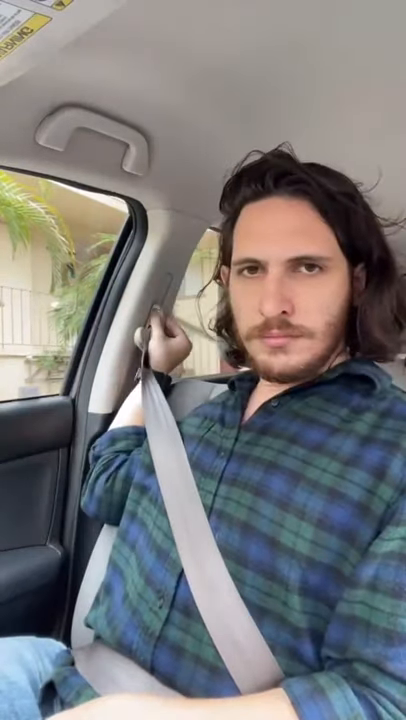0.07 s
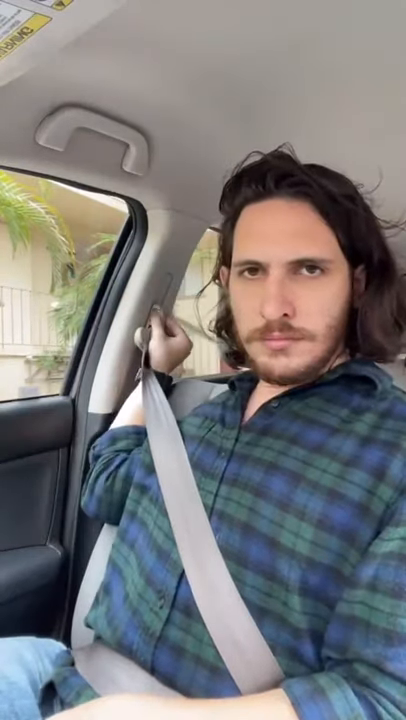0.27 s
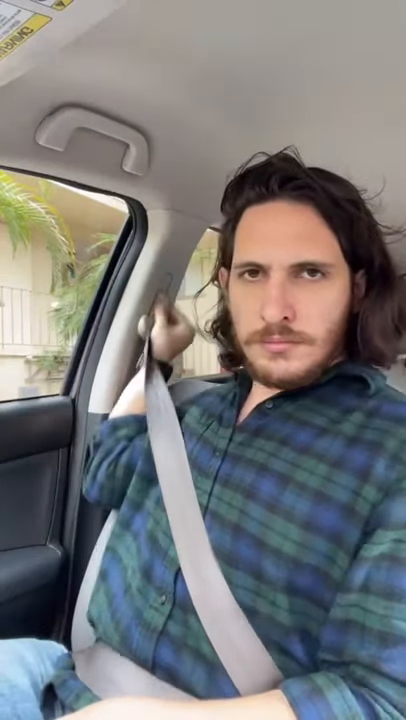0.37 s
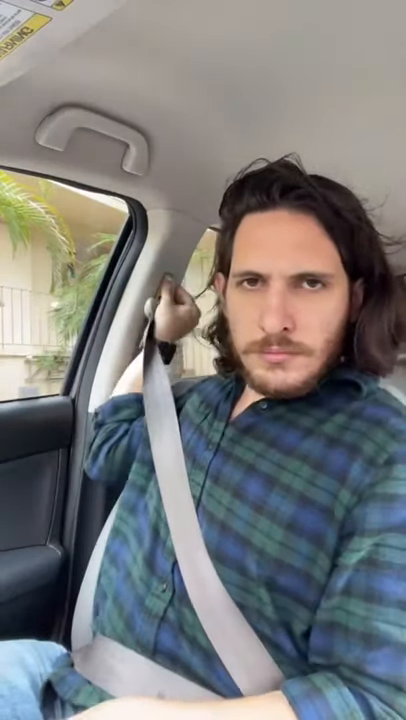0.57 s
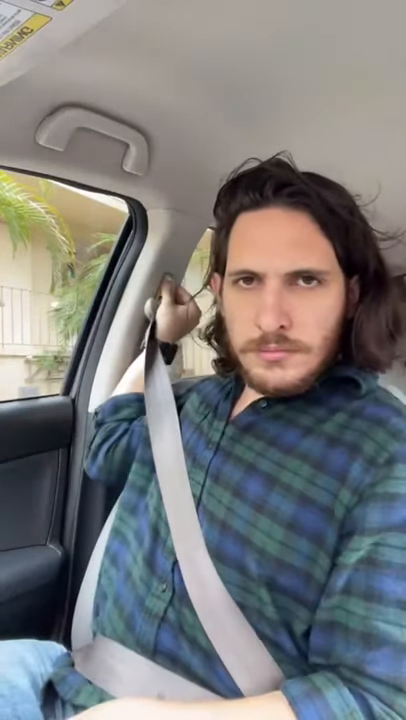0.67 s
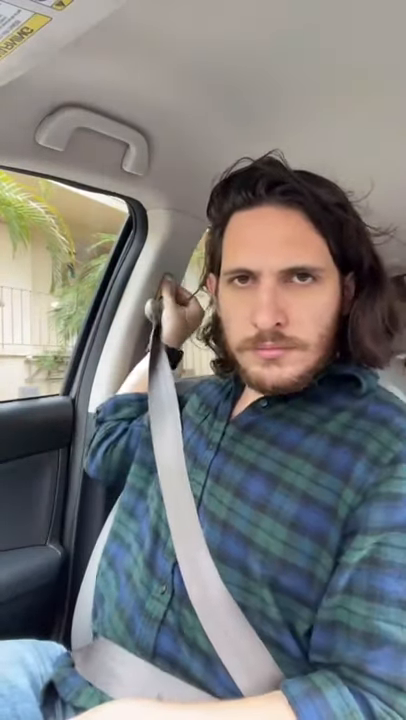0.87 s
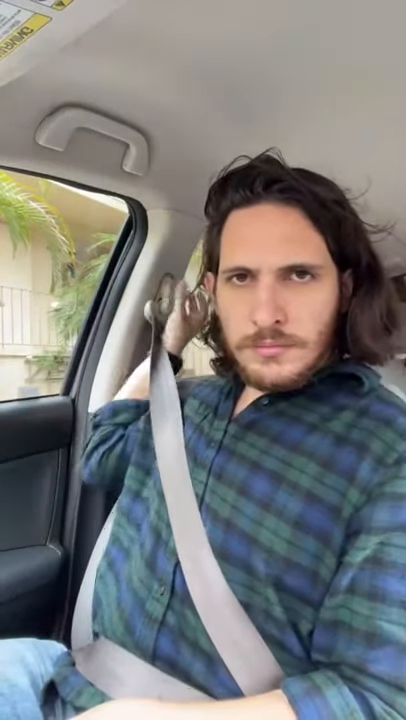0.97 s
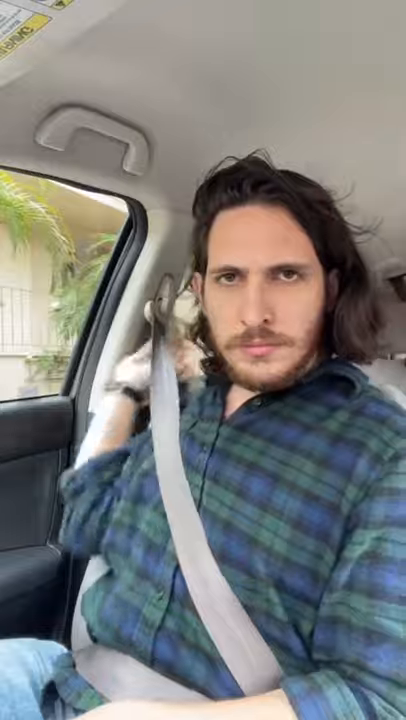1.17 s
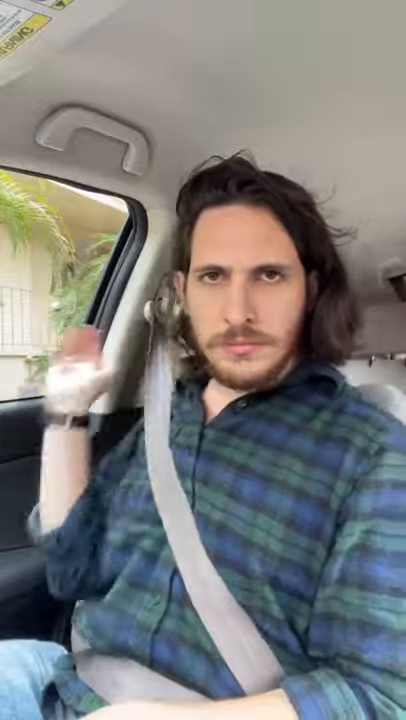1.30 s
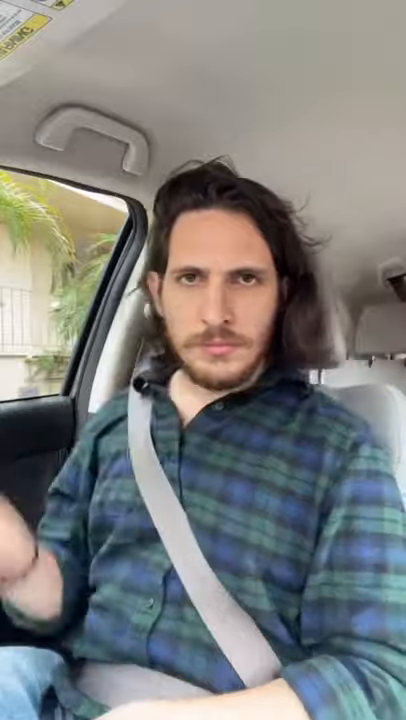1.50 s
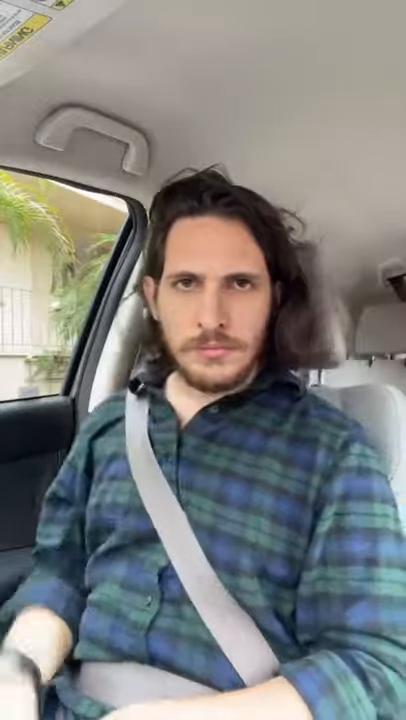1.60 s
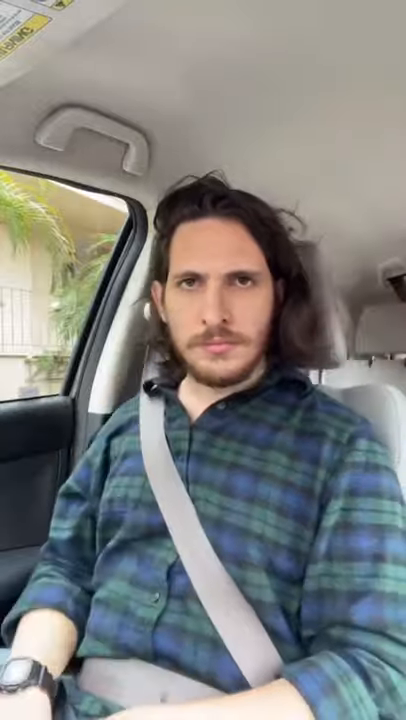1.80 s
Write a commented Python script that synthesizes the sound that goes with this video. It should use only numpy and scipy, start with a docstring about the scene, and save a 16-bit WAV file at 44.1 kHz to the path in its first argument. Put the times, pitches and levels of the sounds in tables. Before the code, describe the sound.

A seatbelt anchor clunks down, then clicks back up inside a car, with soft clothing rustle.

```python
"""Inside a parked car, a seatbelt anchor slides down its pillar and clunks against the stop, then is
pushed up and latches with a double click. Each impact excites damped modes of steel and plastic.
The belt runs back in soft ticks and a shirt sleeve rustles, its friction a stream of tiny slips.
The small padded cabin rumbles, booms in its low modes and quickly absorbs the treble."""
import sys
import numpy as np
from scipy import signal
from scipy.fft import rfft, irfft
from scipy.io import wavfile

SR = 44100
rng = np.random.default_rng(int(sys.argv[2]) if len(sys.argv) > 2 else 0)


def pcm_store(signal):
    """Save signal as 16-bit PCM."""
    levels = np.round(np.clip(np.atleast_2d(signal), -1, 1) * 32767)
    wavfile.write(sys.argv[1], SR, levels.astype(np.int16).T)


N = 81585
CONTACT_RISE_S = 0.00059


def amp(db):
    """Amplitude ratio of a level in decibels."""
    return 10 ** (np.asarray(db) / 20)


def unit(x):
    """Normalisation to an rms of 1."""
    return x / np.sqrt(np.mean(x ** 2) + 1e-20)


def read(points, hz):
    """Interpolation on a log-frequency axis."""
    f, value = np.transpose(points)
    return np.interp(np.log(hz + 1), np.log(f + 1), value)


def level(points):
    """Amplitude envelope, interpolated in decibels."""
    return amp(np.interp(np.arange(N) / SR, *np.transpose(points)))


def colour(x, spectrum):
    """Minimum-phase filtering: the phase follows from the log gain by the Hilbert transform."""
    size = 16384
    log_gain = np.log(amp(read(spectrum, abs(np.fft.fftfreq(size, 1 / SR)))))
    response = np.exp(np.conj(signal.hilbert(log_gain)))
    taps = irfft(response[:size // 2 + 1])[:size // 2]
    return signal.fftconvolve(x, taps * np.hanning(size)[size // 2:])[:N]


def noise(spectrum):
    """Spectrally shaped Gaussian noise of rms 1."""
    return unit(colour(rng.standard_normal(N), spectrum))


def since(start):
    """Elapsed seconds, zero before the start."""
    return np.maximum(np.arange(N) / SR - start, 0)


def blow(start, rise, t60):
    """Impact envelope: linear rise, exponential decay of 60 dB in t60 seconds."""
    t = since(start)
    return np.minimum(t / rise, 1) * amp(-60 * np.minimum(t / t60, 3))


def ring(start, modes, tilt_db=0):
    """Modal superposition: a struck part vibrates as a sum of damped sinusoids."""
    length_s = min(1.2, 2 * max(t60 for hz, db, t60 in modes))
    t = np.arange(0, length_s, 1 / SR)
    middle_hz = modes[len(modes) // 2][0]
    sound = sum(amp(db + tilt_db * np.log2(hz / middle_hz) - 60 * t / t60) * np.sin(2 * np.pi * hz * t)
                for hz, db, t60 in modes)
    return np.pad(sound * np.minimum(t / CONTACT_RISE_S, 1), (round(start * SR), N))[:N]


def friction(spectrum, spread_db, slips_per_s):
    """Stick-slip friction: a filtered Poisson stream of tiny, uneven impulses."""
    slips = (rng.random(N) < slips_per_s / SR) * rng.choice([-1, 1], N)
    sizes = amp(spread_db * np.minimum(rng.exponential(1, N), 4))
    return unit(colour(slips * sizes, spectrum))


def knock(start, hz, t60, q, rattle):
    """Forced response: an impulse and a short rattle drive a broad resonance of plastic."""
    chatter = blow(start, CONTACT_RISE_S, t60) * rng.standard_normal(N)
    drive = rattle * chatter / np.linalg.norm(chatter)
    drive[round(start * SR)] += 1
    sound = signal.lfilter(*signal.iirpeak(hz, q, fs=SR), drive)
    top_hz = min(2.72 * hz, SR / 3)  # a soft contact gives little treble
    sound = signal.lfilter(*signal.butter(2, top_hz, fs=SR), sound)
    return sound / np.linalg.norm(sound) * np.sqrt(SR * t60 / np.log(10 ** 6))


# rumble in the car: frequency_hz, level_db
RUMBLE_SPECTRUM = [(20, -25), (35, -5), (44, 13.5), (51, 0), (60, 7.5), (75, -4), (150, -12.5),
                   (230, -19.5), (450, -37), (900, -34.5), (2000, -41.5), (4000, -49), (6500, -59),
                   (10000, -55.5), (16000, -51)]
# a body shifting in its seat: frequency_hz, level_db
SEAT_SPECTRUM = [(20, -20), (34, -21), (50, 8), (110, 4), (200, -5), (320, -2), (400, -9), (480, -5.5),
                 (700, -17), (1500, -27.5), (4000, -71), (16000, -89)]
# course of the shifting: time_s, level_db
SEAT_ENVELOPE = [(0, -33), (.06, -47.5), (.12, -38), (.19, -28.5), (.25, -25), (.33, -22.5), (.55, -45),
                 (.68, -47.5), (.83, -25), (.95, -35.5), (1.05, -42), (1.13, -39.5), (1.22, -32.5),
                 (1.32, -33), (1.41, -30), (1.49, -45), (1.6, -36), (1.75, -55), (1.85, -57)]


def background():
    """Low-frequency noise: steady for the car's rumble, amplitude-modulated for a body in its seat."""
    return amp(-35) * noise(RUMBLE_SPECTRUM) + level(SEAT_ENVELOPE) * noise(SEAT_SPECTRUM)


# reverberation time of the cabin: frequency_hz, t60_s
CABIN_DECAY = [(60, 0.73), (250, 0.13), (1000, 0.082), (3000, 0.052), (12000, 0.034)]


def cabin(x, delay_s=0.0028, echoes_per_s=3000):
    """Reverberation: random reflections die away, fastest in the treble, which padding absorbs."""
    size = SR // 2
    echoes = rng.standard_normal(size) * (rng.random(size) < echoes_per_s / SR)
    echoes *= np.arange(size) > delay_s * SR
    hz, t, bands = signal.stft(echoes, SR, nperseg=256)
    decay = amp(-60 * t / read(CABIN_DECAY, hz)[:, None])
    tail = signal.istft(bands * decay, SR, nperseg=256)[1]
    return signal.fftconvolve(x, tail / np.linalg.norm(tail))[:N]


# rustling cloth: frequency_hz, level_db
RUSTLE_SPECTRUM = [(100, 1), (400, 3.5), (1200, 4), (2400, -0.5), (4200, -2.5), (6700, -0.5), (9000, -9),
                   (12000, -14.5), (15500, -15)]
# course of the rustle: time_s, level_db
RUSTLE_ENVELOPE = [(0, -54.5), (.05, -59.5), (.68, -55), (.8, -41), (.87, -48.5), (1.0, -45.5),
                   (1.12, -40.5), (1.22, -39), (1.33, -34), (1.42, -42), (1.5, -39), (1.57, -47),
                   (1.7, -51), (1.85, -55)]
# swishing webbing and cloth: frequency_hz, level_db
SWISH_SPECTRUM = [(200, -2), (600, -6), (1000, 4), (1250, 1), (1500, 6), (2050, -4), (2430, 1.5),
                  (2700, 1.5), (3100, 1.5), (3800, -6.5), (4350, 2), (4900, -4), (5500, -3), (6200, 0.5),
                  (7100, -5), (7800, -3.5), (8800, -13), (9600, -10.5), (12000, -17.5), (15500, -18)]
# quick swishes: peak_s, level_db, rise_s, t60_s
SWISHES = [(0.966, -28.5, .016, 0.043), (1.448, -26, 0.0053, 0.15)]


def clothing():
    """Fabric friction: sleeve and webbing give a fine rustle and two quicker swishes."""
    t = np.arange(N) / SR
    rustle = level(RUSTLE_ENVELOPE) * friction(RUSTLE_SPECTRUM, spread_db=3, slips_per_s=12000)
    swells = sum(amp(db) * np.exp(np.minimum(t - s, 0) / rise) * amp(-60 * since(s) / t60)
                 for s, db, rise, t60 in SWISHES)
    return rustle + swells * friction(SWISH_SPECTRUM, spread_db=0, slips_per_s=8300)


# lightly brushed webbing: frequency_hz, level_db
BRUSH_SPECTRUM = [(1000, -23), (5000, -6), (10000, -6), (15500, 5)]


def release():
    """Friction noise: a thin, fading brush as the hand leaves the webbing."""
    return amp(-36) * blow(start=1.445, rise=0.008, t60=0.23) * noise(BRUSH_SPECTRUM)


def bend(x, bass_lag_s=0.00279, half_lag_hz=647):
    """Dispersion of bending waves in a panel: the treble arrives before the bass."""
    hz = np.fft.rfftfreq(2 * N, 1 / SR)
    phase = 2 * np.pi * bass_lag_s * half_lag_hz * np.arctan(hz / half_lag_hz)
    return irfft(rfft(x, 2 * N) * np.exp(-1j * phase))[:N]


# ticks of the belt running back: start_s, level_db, pitch_hz
BELT_TICKS = [(1.1716, -14.5, 580), (1.2, -23, 1200), (1.205, -25.5, 790), (1.2228, -15.5, 930),
              (1.2363, -18.5, 930), (1.253, -24.5, 960), (1.272, -15, 850), (1.3, -17.5, 844),
              (1.31, -19.5, 786), (1.325, -19.5, 1080), (1.331, -17.5, 670), (1.344, -23, 800),
              (1.353, -24, 700), (1.365, -25, 870), (1.372, -19.5, 700), (1.379, -35, 710),
              (1.393, -21.5, 770), (1.418, -18, 755), (1.438, -23, 770), (1.449, -18.5, 730),
              (1.463, -21.5, 655), (1.51, -25, 670), (1.521, -26.5, 1500), (1.554, -26.5, 606),
              (1.57, -24.5, 1130), (1.591, -24, 610), (1.595, -28, 1520), (1.653, -22.5, 610),
              (1.717, -21, 610), (1.7213, -21.5, 1570)]
# response of the plastic guide: frequency_hz, level_db
GUIDE_SPECTRUM = [(40, 12.5), (150, 7.5), (240, 6), (315, 7), (390, 0.5), (475, 4.5), (590, -1), (780, -5),
                  (910, -1.5), (1130, -3.5), (1400, -8.5), (1950, -2.5), (3200, -7.5), (6000, -9),
                  (15000, -18)]
# course of the belt's rubbing: time_s, level_db
RUB_ENVELOPE = [(1.1, -61), (1.2, -32.5), (1.28, -38.5), (1.33, -26.5), (1.4, -31.5), (1.46, -29),
                (1.5, -63), (1.59, -42), (1.64, -43), (1.85, -56)]


def belt():
    """Cavity resonance: webbing ticks and rubs through its guide, exciting the hollow behind it."""
    ticks = sum(amp(db) * knock(s, hz, t60=0.023, q=1.75, rattle=1.3) for s, db, hz in BELT_TICKS)
    rub = friction(GUIDE_SPECTRUM, spread_db=1, slips_per_s=3500)
    dull_rub = signal.lfilter(*signal.butter(1, 1470, fs=SR), rub)
    guide = bend(colour(ticks, GUIDE_SPECTRUM) + level(RUB_ENVELOPE) * unit(dull_rub))
    hollow = signal.lfilter(*signal.iirpeak(482, Q=10, fs=SR), guide)
    return guide + amp(2) * hollow


# dull thumps of trim and seat: start_s, level_db, t60_s
THUMPS = [(0.297, -17.5, 0.41), (0.449, -24.5, 0.51), (0.799, -27.5, 0.54), (1.2, -25.5, 0.31),
          (1.445, -27, 0.65)]
# their bass-heavy colour: frequency_hz, level_db
THUMP_SPECTRUM = [(20, -38), (36, -19), (50, 0.5), (70, 4.5), (100, -1), (160, 2.5), (220, -18), (450, -35),
                  (900, -48), (3000, -59), (16000, -100)]


def thumps(rise_s=0.016):
    """Incoherent summation: overlapping thumps of trim and seat add in power."""
    power = sum((amp(db) * blow(s, rise_s, t60)) ** 2 for s, db, t60 in THUMPS)
    return noise(THUMP_SPECTRUM) * np.sqrt(power)


# low modes of body shell and cabin air: pitch_hz, level_db, t60_s
SHELL_MODES = [(50.47, -2, 1), (66.6, 5.5, 0.23), (79.5, -1, 0.37), (93.2, 1.5, 0.45), (115.8, -2, 0.57),
               (147, 0.5, 0.21), (166.6, -8.5, 0.44)]
# jolts of the shell: start_s, level_db, damping_t60_s
JOLTS = [(0.301, -12, 6.1), (0.446, -18.5, 0.24)]


def shell(rise_s=0.0098):
    """Damped vibration: the jolted body shell booms, and hand and seat add to its losses."""
    return sum(amp(db) * ring(s, SHELL_MODES) * blow(s, rise_s, t60) for s, db, t60 in JOLTS)


# modes of the pillar: pitch_hz, level_db, t60_s
PILLAR_MODES = [(266, 10, 0.28), (333.4, -3, 0.53), (455, -15, 0.24), (443, -18.5, 0.66), (550, -21, 0.17),
                (705, -10, .28), (844, -8.5, 0.34), (886, -4.5, 0.36), (978, -7.5, 0.91), (1020, 2, 0.2),
                (1132, 0, 0.16), (1165, 8.5, 0.085), (1380, -12, 0.096), (1615, -11.5, 0.22)]
# blows on the pillar: start_s, level_db, tilt_db_per_octave
PILLAR_BLOWS = [(0.286, -45, -6), (.781, -26.5, 3.5)]


def pillar():
    """Free vibration: the pillar's sheet steel rings on after each stop."""
    return sum(amp(db) * ring(s, PILLAR_MODES, tilt_db) for s, db, tilt_db in PILLAR_BLOWS)


# scrape on the rail: frequency_hz, level_db
SCRAPE_SPECTRUM = [(30, -16), (120, 2), (350, -6), (480, 4.5), (570, -9), (650, 2.5), (720, -3.5), (800, 1),
                   (940, -5), (1030, 4), (1200, 0), (1320, -7.5), (1520, -1.5), (2300, -20.5),
                   (4500, -22.5), (7000, -25), (9000, -31), (15000, -60)]
# course of the scrape: time_s, level_db
SCRAPE_ENVELOPE = [(0, -54), (.13, -72), (.175, -52), (.195, -27.5), (.235, -19.5), (.28, -22), (.3, -26.5),
                   (.35, -35.5), (.41, -44.5), (.48, -71), (.6, -96)]
# hiss of dragged webbing: frequency_hz, level_db
HISS_SPECTRUM = [(500, -43), (2000, 5.5), (3300, 1), (4500, -1), (6500, 2), (9000, -7.5), (12000, -9.5),
                 (15500, -13)]
# course of the hiss: time_s, level_db
HISS_ENVELOPE = [(.08, -59.5), (.14, -54), (.19, -39.5), (.235, -37), (.28, -36), (.305, -52), (.4, -54),
                 (.46, -69)]


def slider():
    """Sliding friction: the anchor scrapes along its rail and drags the hissing webbing with it."""
    scrape = level(SCRAPE_ENVELOPE) * friction(SCRAPE_SPECTRUM, spread_db=1, slips_per_s=5000)
    return scrape + level(HISS_ENVELOPE) * noise(HISS_SPECTRUM)


# knocks in the plastic trim: start_s, level_db, pitch_hz, t60_s
TRIM_KNOCKS = [(0.1025, -30, 750, 0.031), (.151, -29.5, 900, 0.032), (0.256, -11, 690, 0.03),
               (0.2611, -7, 560, 0.031), (0.271, -15, 810, 0.059), (0.2843, -12, 796, 0.044),
               (.2865, -8.5, 1940, 0.04), (0.2881, -5, 420, 0.021), (.343, -25, 690, 0.074),
               (0.393, -26.5, 724, 0.041), (.459, -41, 860, 0.051), (0.726, -28, 1880, 0.08),
               (0.742, -28, 780, 0.086), (0.777, -13, 640, 0.023), (.782, -13.5, 890, 0.064),
               (0.793, -18, 1070, 0.043)]
# response of the trim: frequency_hz, level_db
TRIM_SPECTRUM = [(40, -17), (150, -2), (330, -2.5), (480, 4), (650, 1), (760, 1), (1050, 1.5), (1350, -6),
                 (2100, -4.5), (3200, -14), (6000, 3), (15000, -37)]
# modes of the hard plastic cover: pitch_hz, level_db, t60_s
COVER_MODES = [(1020, -3, .04), (1470, -9, .03), (1590, -7, .03), (2005, 0, .034), (2170, -2, .028),
               (2320, -6, .02)]
# blows on the cover: start_s, level_db
COVER_BLOWS = [(.2848, -7.5), (0.2906, -15.5), (1.7205, -36)]


def trim():
    """Heavily damped resonance: the slider knocks on the hollow trim and clacks on its cover."""
    knocks = sum(amp(db) * knock(s, hz, t60, q=1, rattle=1.55) for s, db, hz, t60 in TRIM_KNOCKS)
    clacks = sum(amp(db) * ring(s, COVER_MODES) for s, db in COVER_BLOWS)
    return colour(knocks, TRIM_SPECTRUM) + clacks


# snaps of the locking pin: start_s, level_db
PIN_SNAPS = [(0.7401, -10.5), (0.7699, -1.5)]
# their bright colour: frequency_hz, level_db
SNAP_SPECTRUM = [(500, -16.5), (2800, -7.5), (4000, -0.5), (4600, 0.5), (5900, 5), (6400, -8), (7300, 3),
                 (9000, -26), (12000, -18), (15300, -25), (16500, -34)]


def snaps():
    """Broadband transients: the spring-loaded pin shoots home with two short, bright cracks."""
    return noise(SNAP_SPECTRUM) * sum(amp(db) * blow(s, rise=0.0004, t60=0.014) for s, db in PIN_SNAPS)


# strikes of the catch: start_s, clash_db, noise_t60_s, slider_db, pin_db, tick_db
CATCH_STRIKES = [(0.2819, -11, 0.037, -43, -36, -15.5), (0.2848, -11, 0.031, -29, -31, -40),
                 (0.2891, -45, 0.025, -4, -48, -50), (0.2985, -32, 0.028, -35, -42, -59),
                 (0.7381, -17.5, 0.039, -16, -21.5, -42), (0.7431, -19.5, 0.15, -22, -32, -55),
                 (0.7661, -24, 0.062, -48, -30, -22.5), (0.7707, -17, 0.018, -22, -10, -20),
                 (0.7764, -21.5, 0.031, -40, -34, -20)]
# clash of steel: frequency_hz, level_db
CLASH_SPECTRUM = [(200, 3), (1000, -2), (2200, -1.5), (3200, -4.5), (4000, -5), (4480, -16), (4900, -4),
                  (5700, -2), (6400, -7), (7300, -9), (8500, -13), (9600, -13), (11000, -25), (16000, -38)]
# top-octave tick: frequency_hz, level_db
TICK_SPECTRUM = [(3000, -69), (8000, 1), (10000, -3.5), (12500, -12.5), (14000, -5), (15200, -3),
                 (16500, -1)]
# modes of the steel slider: pitch_hz, level_db, t60_s
SLIDER_MODES = [(5300, -15, .03), (5940, -14, .075), (6060, 0, .026), (6130, -12, .07), (6500, -14, .03)]
# modes of the locking pin: pitch_hz, level_db, t60_s
PIN_MODES = [(2445, -12, 0.04), (2700, -14, 0.05), (4005, 0, 0.036), (4400, -5, .02), (5300, -5, .025),
             (5650, -4, .03), (5920, -2, 0.035), (6885, -10, .065), (7120, -8, 0.055), (7700, -11, 0.045),
             (9400, -15, .05)]


def catch():
    """Impact excitation: the steel catch clashes on its rail; slider and pin ring briefly."""
    clash, tick = noise(CLASH_SPECTRUM), noise(TICK_SPECTRUM)
    return sum(blow(s, CONTACT_RISE_S, t60) * (amp(clash_db) * clash + amp(tick_db) * tick)
               + amp(slider_db) * ring(s, SLIDER_MODES) + amp(pin_db) * ring(s, PIN_MODES)
               for s, clash_db, t60, slider_db, pin_db, tick_db in CATCH_STRIKES)


def scene():
    """Superposition: near sources and their reverberation add to the car's own vibration and rumble."""
    near = catch() + snaps() + trim() + belt() + slider() + clothing() + release()
    return (near + amp(-13.5) * cabin(near) + thumps() + shell() + pillar() + background())[None]


def record(dry, low_cut_hz=33, ceiling=0.96, top_hz=15850):
    """Band limiting and saturation: the microphone drops deep bass, rounds peaks and cuts the top."""
    thinned = signal.sosfilt(signal.butter(6, low_cut_hz, "high", fs=SR, output="sos"), dry)
    rounded = thinned / (1 + (thinned / ceiling) ** 6) ** (1 / 6)
    low_pass = signal.firwin(511, top_hz, window=("kaiser", 9), fs=SR)
    return signal.oaconvolve(rounded, low_pass[None], "same")


dry = scene()
out = record(dry)
pcm_store(out)
```